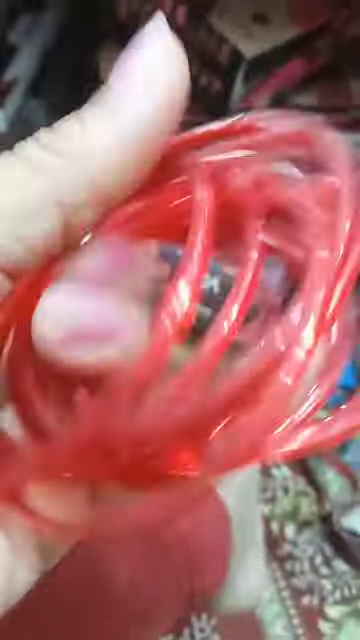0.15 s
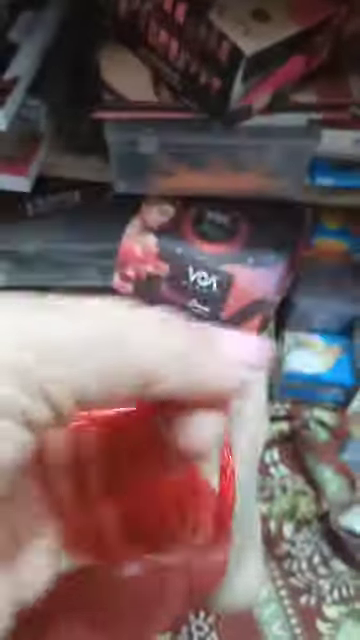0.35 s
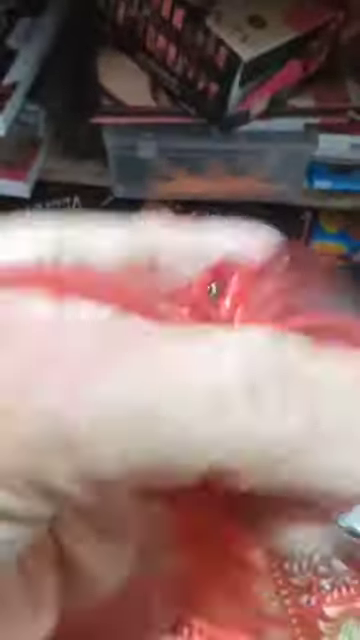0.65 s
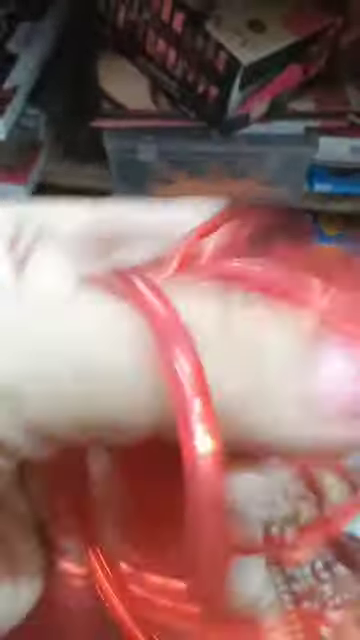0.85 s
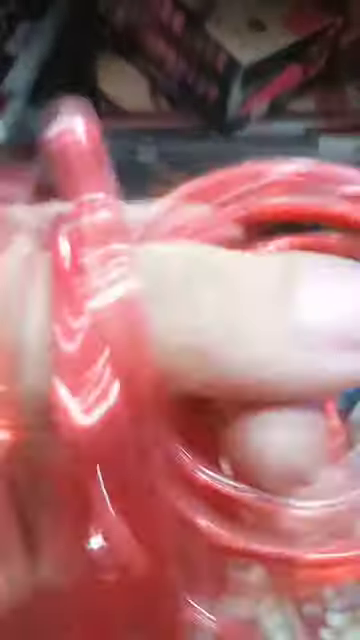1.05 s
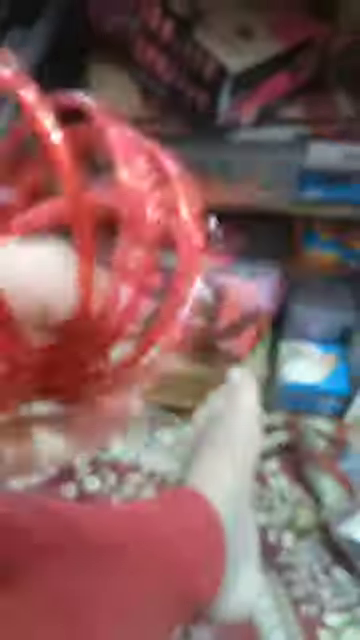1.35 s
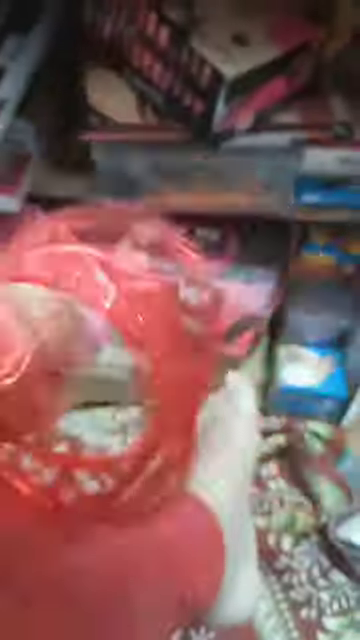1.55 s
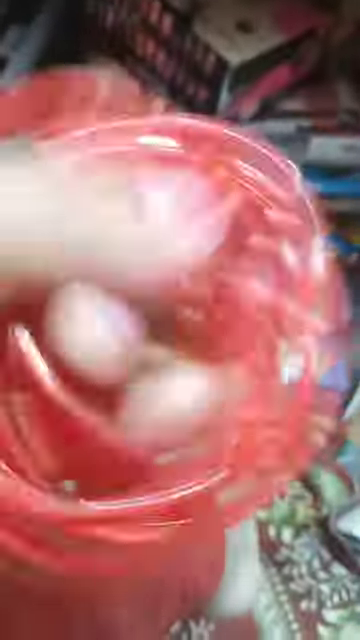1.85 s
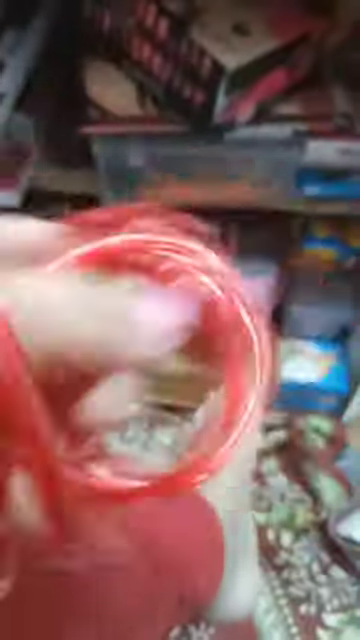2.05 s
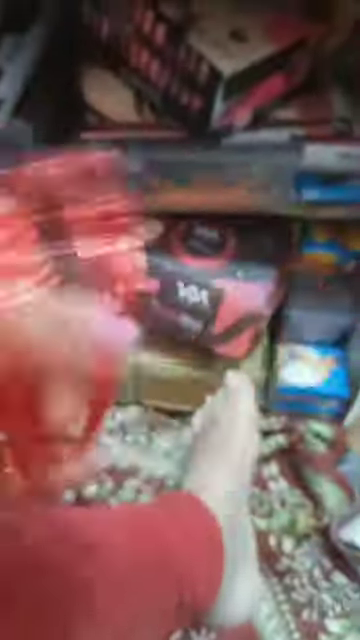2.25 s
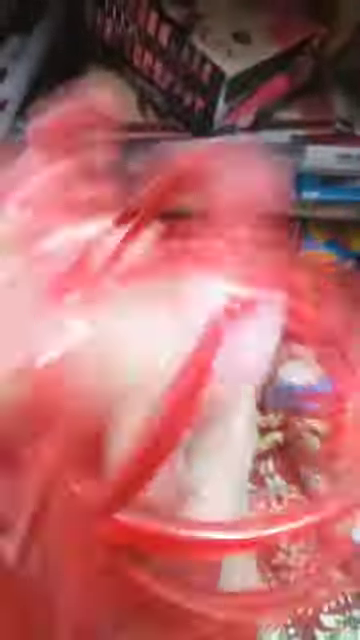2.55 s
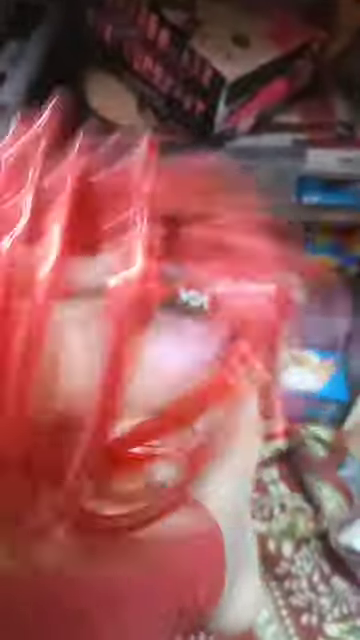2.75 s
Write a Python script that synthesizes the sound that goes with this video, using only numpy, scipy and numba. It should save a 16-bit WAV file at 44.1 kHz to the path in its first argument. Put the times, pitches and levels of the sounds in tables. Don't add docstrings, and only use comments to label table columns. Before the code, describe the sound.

Glass bangles rattling together in a hand, bright dense clinks very near, in a quiet small room

```python
import sys
import numpy as np
from numba import njit
from scipy import signal
from scipy.io import wavfile

SR = 44100
rng = np.random.default_rng(int(sys.argv[2]) if len(sys.argv) > 2 else 0)


def inscribe(sig):
    pcm = np.round(np.clip(np.atleast_2d(sig).T, -1, 1) * 32767)
    wavfile.write(sys.argv[1], SR, pcm.astype(np.int16))


def boost(x):
    u = np.asarray(x, float) / 20
    return 10 ** u


N = 127890

# f/Hz, level/dB per Hz
RUMBLE_SPECTRUM = [(18, -78), (30, -35), (86, -1.5), (161, -26.5), (194, 1), (272, 3), (468, 6),
                   (687, -13.5), (900, -93), (1170, -41), (1980, -120)]
HISS_SPECTRUM = [(600, -15), (800, -3), (1100, 9), (1800, 4), (2600, -0.5), (4000, -11.5), (7000, -12.5),
                 (9000, -51), (16000, -22)]
RUMBLE_DB, HISS_DB = -51.5, -58.5
HUM_HZ, HUM_DB, HUM_WANDER_DB, HUM_WANDER_RAD = 200, -62, 2.0, 1.2
ROOM_T60_S, WET_DB = 0.2, -14

# f/Hz, level/dB per Hz
AIR_SPECTRUM = [(22, -50), (40, -13), (70, -0.5), (120, 2), (200, -4), (350, -19), (500, -72)]
# peak t/s, level/dB, half-width/s
PUFFS = [(.08, -50.5, 0.044), (.19, -47.5, 0.025), (.235, -50, .025), (.28, -47, 0.028),
         (0.489, -45, 0.034), (.57, -49.5, 0.047), (0.789, -45, 0.056), (.9, -60, 0.043),
         (1.109, -42.5, 0.031), (1.309, -50, 0.029), (1.42, -65, 0.038), (1.74, -54.5, 0.037),
         (2.0, -70, 0.035), (2.18, -64, 0.025), (2.36, -60, 0.012)]
STILL_DB, STILL_FALL_DB_PER_S = -65.5, 2

KNOCK_S, KNOCK_DB, KNOCK_HZ, KNOCK_T60_S = 0.4185, -38.5, 600, 0.051
# t/s, f/Hz, level/dB, t60/s
TICKS = [(.572, 9500, -59.5, 0.074), (.572, 15000, -63, .05), (.572, 12000, -70, .05),
         (0.595, 9600, -53, 0.036), (0.884, 8021, -49.5, 0.084), (.8825, 12910, -60, .04),
         (0.964, 5400, -47, 0.29), (1.463, 5750, -33.5, 0.056), (2.041, 5770, -45, 0.13),
         (2.113, 5780, -49, 0.11), (2.501, 5260, -45, 0.1), (2.579, 4300, -48, 0.088),
         (2.68, 5130, -51, .1), (2.708, 5640, -45.5, 0.1)]
LONE_MODE_HZ = [1631, 4167, 4581, 4657, 5911, 6562, 8010, 8689, 8742, 12970, 13940]
# level/dB, t60/s
LONE_MODES = [(-6.5, 0.43), (-11, .12), (5, 0.31), (-12, 0.12), (4, 0.04), (-0.5, 0.057), (-13, 0.3),
              (2, 0.19), (-5, 0.11), (-1, 0.11), (-11, .12)]
LONE_S, LONE_DB, LONE_CRACK_DB = 0.2016, -46, -26.5

# second bending mode f/Hz, level/dB, t60/s
BANGLES = [(4360, -8.5, 0.039), (4583, -3.5, 0.039), (4830, -8.5, 0.12), (5023, 0.5, 0.038),
           (5125, -4.5, 0.066), (5513, -4, 0.043), (5750, -6, 0.04)]
# f ratio to second bending mode, level/dB, t60 factor
RING_MODES = [(.356, -18.5, 1.27), (0.91, -22, 0.69), (1.0, -2.5, 0.8), (1.321, -13, 0.59),
              (1.467, -13.5, 0.74), (1.736, -21, 1.2), (1.853, -10, 0.64), (2.07, -28, 0.59),
              (2.273, -15.5, 0.78), (2.549, -9.5, 0.4), (2.78, -27, 0.3), (3.03, -3.5, 0.44),
              (3.3, 4, 0.25)]
SPLIT = 0.0107
REGRIP, FREED_DB = 0.006, 6.0
EARLY_JOLT_S = [.312, .355, .397, .430, .443, .500, .594, .614, .645, .683, .696, .710, .785, .840, .884,
                .914, .938, .965, 1.003, 1.015, 1.057, 1.100, 1.170, 1.224, 1.258, 1.330, 1.383, 1.406,
                1.455, 1.495, 1.564]
LATE_JOLT_S = [1.598, 1.630, 1.688, 1.722, 1.754, 1.797, 1.828, 1.868, 1.894, 1.951, 1.985, 2.004, 2.042,
               2.063, 2.113, 2.142, 2.165, 2.245, 2.280, 2.320, 2.355, 2.415, 2.461, 2.493, 2.538, 2.579,
               2.666, 2.707, 2.765, 2.794, 2.819, 2.863]
# force level/dB, f/Hz of ring struck hardest, flurry length/s
JOLTS = [(-38.5, 4100, 0.027), (-32, 5120, 0.025), (-27, 4200, 0.016), (-25.5, 6400, 0.0058),
         (-26, 8400, 0.014), (-33, 4500, 0.0033), (-47, 8200, 0.0064), (-28.5, 4760, 0.0031),
         (-51, 5560, 0.01), (-30.5, 2600, 0.017), (-19.5, 6500, .012), (-19, 5600, 0.059),
         (-20.5, 6200, 0.038), (-28, 4945, 0.005), (-39.5, 5600, .03), (-19.5, 5120, 0.023),
         (-18.5, 5560, 0.016), (-24, 6600, 0.024), (-24, 11000, 0.014), (-28, 4900, 0.041),
         (-22.5, 5400, 0.084), (-19, 5120, 0.088), (-23, 2300, 0.066), (-28, 4760, 0.028),
         (-16.5, 5120, 0.052), (-21.5, 4300, 0.043), (-20, 7800, 0.025), (-21.5, 5100, 0.056),
         (-21.5, 4600, 0.038), (-16, 4200, 0.0044), (-28, 4945, 0.025),
         (-16, 6400, 0.034), (-19, 5120, 0.045), (-22, 5120, 0.027), (-21, 5120, 0.046),
              (-24, 3800, 0.02), (-33.5, 5120, .016), (-38.5, 3000, 0.007), (-32, 4800, 0.026),
              (-20, 3700, 0.035), (-22, 8000, 0.013), (-23, 7100, 0.0058), (-28.5, 4000, 0.014),
              (-27, 3500, 0.025), (-27, 4440, 0.02), (-28, 3600, 0.031), (-19.5, 2800, 0.025),
              (-20.5, 4900, 0.043), (-37.5, 4945, 0.016), (-29.5, 2700, 0.034), (-22, 4945, 0.07),
              (-24, 4760, 0.022), (-28, 8000, 0.046), (-27, 3000, 0.023), (-28, 7900, 0.032),
              (-28, 13000, 0.024), (-31.5, 4900, 0.13), (-31.5, 3400, 0.027), (-27, 5300, 0.011),
              (-45.5, 5120, 0.031), (-34.5, 5900, .015), (-39.5, 3800, 0.012), (-42, 4000, 0.011)]
EARLY_RISE_S = [.001, 0.018, 0.0033, 0.0018, .001, 0.0026, .002, 0.00084, .003, .001, 0.01, .002, 0.0034,
                0.0039, 0.0023, .001, 0.0068, 0.0023, 0.0045, .001, 0.0023, 0.0049, .002, .002, 0.026,
                0.0026, 0.0028, 0.0018, 0.0065, 0.0048, .001]
LATE_RISE_S = [0.032, .008, 0.0051, 0.015, 0.0025, .004, 0.0022, .004, 0.0009, 0.0016, 0.0015, 0.0018, .006,
               0.0018, 0.0064, 0.0013, .012, .001, 0.0025, 0.00077, .002, 0.0095, .002, 0.0028, .003, 0.003,
               .001, .002, .004, 0.00088, 0.0026, .003]
# t/s, level/dB
CLINKS = [(0.4432, -31), (0.613, -37), (0.7105, -33), (0.7545, -25), (0.809, -40), (0.8463, -27),
          (0.9144, -34), (0.9543, -22), (1.0155, -20.5), (1.0221, -14), (1.042, -25), (1.062, -38),
          (1.1068, -20), (1.1359, -20), (1.153, -23), (1.1705, -27), (1.224, -30), (1.2317, -23.5),
          (1.2893, -16), (1.3032, -29), (1.322, -23), (1.3332, -21), (1.3575, -35), (1.4069, -42),
          (1.421, -35), (1.4273, -36), (1.4439, -32), (1.4638, -22), (1.5044, -24.5), (1.5119, -36),
          (1.5642, -24.5), (1.64, -31), (1.6927, -18), (1.74, -21), (1.757, -24), (1.828, -31),
          (1.956, -37), (1.986, -23), (2.0039, -30), (2.0645, -34.5), (2.1195, -37), (2.1423, -31),
          (2.2454, -39.5), (2.282, -41), (2.3223, -38), (2.358, -26), (2.4758, -36), (2.5124, -46),
          (2.54, -36), (2.583, -26.5), (2.6672, -37), (2.674, -30), (2.708, -42), (2.7232, -23.5),
          (2.7958, -41.9), (2.8216, -35)]
TOUCHES_PER_S, SIZE_SPREAD_DB, MODE_SPREAD_DB, OTHERS_DB = 2300, 1.8, 4.0, -7
RELEASE_S, SAG_S = 0.012, 0.09
FIRST_TOUCH_DB, SHARP_S = 0.5, 0.011
JINGLE_DB = -27.0
CRACK_DB, CRACK_LOW_HZ, CRACK_T60_S = -32, 4300, 0.006
HIT_DB, HIT_CRACK_DB, HIT_LOW_HZ, HIT_T60_S = 4.0, 18.0, 9000, 0.011

PORT_HZ = [9350, 11500, 15550]
# width/Hz, added level/dB
PORT = [(940, -2.5), (710, 3.5), (900, 11.5)]
CUTOFF_HZ = 15680


def rms_one(x):
    return x / np.sqrt(np.mean(x ** 2) + 1e-20)


def drift(rate_hz):
    r = np.exp(-80 * np.pi * rate_hz / SR)
    white = rng.standard_normal(N // 40 + 2002)
    slow = signal.lfilter([1], [1, -2 * r, r * r], white)[2000:]
    return np.interp(np.arange(N) / 40, np.arange(len(slow)), rms_one(slow))


def coloured(spectrum, patchy_db):
    hz, db = np.transpose(spectrum)
    edges_hz = 22 * 2 ** np.arange(0, 9.7, 1 / 3)
    out, white = 0, rng.standard_normal((2, N))
    for k, (low, high) in enumerate(zip(edges_hz, edges_hz[1:])):
        level_db = np.interp(np.log(low * high) / 2, np.log(hz), db, left=-90, right=-90)
        if level_db < -60:
            continue
        sos = signal.butter(2, [low, high], "band", fs=SR, output="sos")
        band = signal.sosfilt(sos, white[k % 2])
        out = out + boost(level_db + patchy_db * drift(19.8)) * band
    return rms_one(out)


def room_tone():
    hum_level = boost(HUM_DB + 3 + HUM_WANDER_DB * drift(4))
    phase = 2 * np.pi * HUM_HZ * np.arange(N) / SR + HUM_WANDER_RAD * drift(3)
    rumble = boost(RUMBLE_DB) * coloured(RUMBLE_SPECTRUM, patchy_db=3.5)
    hiss = boost(HISS_DB) * coloured(HISS_SPECTRUM, patchy_db=1.6)
    return rumble + hiss + hum_level * np.sin(phase)


def air():
    t = np.arange(N) / SR
    flow = boost(STILL_DB - STILL_FALL_DB_PER_S * t)
    for s, db, width_s in PUFFS:
        flow = flow + boost(db) * np.exp(-((t - s) / width_s) ** 2)
    return flow * coloured(AIR_SPECTRUM, patchy_db=1.5)


def one_click(s, db):
    x = np.zeros(N)
    x[int(s * SR)] = boost(db)
    return x


def decay(t60_s):
    return boost(-60 / (t60_s * SR))


def ring(clicks, hz, t60_s):
    r, w = decay(t60_s), 2 * np.pi * hz / SR
    return signal.lfilter([0, np.sin(w)], [1, -2 * r * np.cos(w), r * r], clicks + 1e-18)


def crack(clicks, t60_s, low_hz):
    envelope = signal.lfilter([1], [1, -decay(t60_s)], np.abs(clicks) + 1e-18)
    tail = envelope * rng.standard_normal(N)
    sos = signal.butter(3, low_hz, "high", fs=SR, output="sos")
    return signal.sosfilt(sos, clicks + 1.06 * tail)


def finger_bump():
    envelope = signal.lfilter([1], [1, -decay(KNOCK_T60_S)], one_click(KNOCK_S, KNOCK_DB))
    sos = signal.butter(1, KNOCK_HZ, fs=SR, output="sos")
    return 4 * signal.sosfilt(sos, envelope * rng.standard_normal(N))


def lone_touches():
    snap = crack(one_click(LONE_S, LONE_CRACK_DB + 1.0), 0.0069, low_hz=2330)
    out = signal.lfilter([0.5, 0.5], [1], snap)
    for hz, (db, t60_s) in zip(LONE_MODE_HZ, LONE_MODES):
        out = out + ring(one_click(LONE_S, LONE_DB + db), hz, t60_s)
    for s, hz, db, t60_s in TICKS:
        out = out + ring(one_click(s, db), hz, t60_s)
    return out


def bangle_modes(jolts):
    owner, gain, poles = [], [], []
    for b, (hz, bangle_db, t60_s) in enumerate(BANGLES):
        held_hz = hz * (1 + REGRIP * rng.standard_normal(jolts))
        for ratio, mode_db, longer in RING_MODES:
            for side in (-1, 0, 1):
                offset = side + rng.uniform(-0.57, 0.43, jolts)
                mode_hz = held_hz * ratio * (1 + min(ratio - 0.3, 1) * SPLIT * offset)
                freed_db = FREED_DB * np.clip(rng.standard_normal(jolts), -2, 1.7)
                owner.append(b)
                gain.append(boost(bangle_db + mode_db + freed_db) * (hz * ratio < 16500))
                poles.append(decay(t60_s * longer) * np.exp(2j * np.pi * mode_hz / SR))
    return np.array(owner), np.array(gain).T.copy(), np.array(poles).T


@njit(fastmath=True)
def ring_all(clicks, struck, scatter, owner, shift, gain, cos, sin, grip):
    out, re, im = np.zeros(len(grip)), np.zeros(len(owner)), np.zeros(len(owner))
    for i in range(len(grip)):
        if struck[i]:
            for m in range(len(owner)):
                re[m] += gain[grip[i], m] * clicks[owner[m], i] * scatter[shift[m] + i]
        c, s, total = cos[grip[i]], sin[grip[i]], 0.
        for m in range(len(owner)):
            a = re[m] * c[m] - im[m] * s[m] + 1e-18
            im[m] = re[m] * s[m] + im[m] * c[m]
            re[m] = a
            total += im[m]
        out[i] = total
    return out


def flurries(starts_s):
    t, bangles = np.arange(N) / SR, np.arange(len(BANGLES))
    pitches_hz = np.array(BANGLES)[:, 0]
    force, hard, leads = np.zeros((len(BANGLES), N)), np.zeros((len(BANGLES), N)), []
    jolts = zip(starts_s, JOLTS, EARLY_RISE_S + LATE_RISE_S)
    for s, (db, hz, length_s), rise_s in jolts:
        start = int(s * SR)
        span = slice(start, start + SR // 4)
        lead = np.argmin(abs(pitches_hz - hz))
        age_s = t[span] - t[span][0]
        swell = np.minimum(0.15 + age_s / max(rise_s, 1e-4), 1)
        fade = np.exp(-np.maximum(age_s - length_s, 0) / RELEASE_S - age_s / SAG_S)
        share = np.where(bangles == lead, 1, boost(OTHERS_DB))
        force[:, span] = np.maximum(force[:, span], boost(db) * share[:, None] * swell * fade)
        hard[lead, start] = boost(db + FIRST_TOUCH_DB) * np.exp(-rise_s / SHARP_S)
        leads.append(lead)
    return force, hard, leads


def soft_touches(force):
    sizes = boost(SIZE_SPREAD_DB * np.minimum(rng.exponential(1, N), 3.0)) * rng.choice([-1, 1], N)
    touch = sizes * (rng.random(N) < TOUCHES_PER_S / SR)
    dealt = rng.integers(0, len(BANGLES), N) == np.arange(len(BANGLES))[:, None]
    return touch * dealt * force


def jingle():
    starts_s = EARLY_JOLT_S + LATE_JOLT_S
    force, hard, leads = flurries(starts_s)
    grip = np.maximum(np.searchsorted(starts_s, np.arange(N) / SR, side="right") - 1, 0)
    for k, (s, db) in enumerate(CLINKS):
        i = int(s * SR)
        hard[[leads[grip[i]], k % len(BANGLES)], i] = boost(db + HIT_DB)
    clicks = soft_touches(force) + hard

    scatter_db = MODE_SPREAD_DB * np.clip(rng.standard_normal(2 * N), -2, 2)
    scatter = boost(scatter_db) * rng.choice([-1, 1], 2 * N)
    owner, gain, poles = bangle_modes(len(starts_s))
    shift = rng.integers(0, N, len(owner))
    ringing = ring_all(clicks, clicks.any(axis=0), scatter, owner, shift, gain,
                       poles.real.copy(), poles.imag.copy(), grip)

    clinks = sum(one_click(s, db + HIT_CRACK_DB) for s, db in CLINKS)
    snaps = crack(clicks.sum(axis=0), CRACK_T60_S, CRACK_LOW_HZ)
    snaps = snaps + crack(clinks, HIT_T60_S, HIT_LOW_HZ)
    return boost(JINGLE_DB) * ringing + boost(CRACK_DB) * snaps


def port(x):
    out = x
    for hz, (width_hz, db) in zip(PORT_HZ, PORT):
        r, w = np.exp(-np.pi * width_hz / SR), 2 * np.pi * hz / SR
        b = np.array([1, 0, -1]) * (1 - r * r) / 2
        out = out + boost(db) * signal.lfilter(b, [1, -2 * r * np.cos(w), r * r], x)
    return out


def echo(x):
    t = np.arange(SR // 2) / SR
    dull = signal.lfilter([0.5], [1, -0.5], rng.standard_normal(len(t)))
    tail = dull * boost(-60 * t / ROOM_T60_S) * (t > 0.004)
    return signal.fftconvolve(x, tail / np.sqrt(np.sum(tail ** 2)))[:N]


def scene():
    glass = port(jingle()) + lone_touches() + finger_bump()
    mix = room_tone() + air() + glass + boost(WET_DB) * echo(glass)
    return mix[None]


def top_cut(x):
    return signal.sosfilt(signal.butter(12, 17120, fs=SR, output="sos"), x)


def record(dry):
    sos = signal.ellip(12, 0.5, 70, CUTOFF_HZ, fs=SR, output="sos")
    return top_cut(signal.sosfilt(sos, dry))


dry = scene()
out = record(dry)
inscribe(out)
```